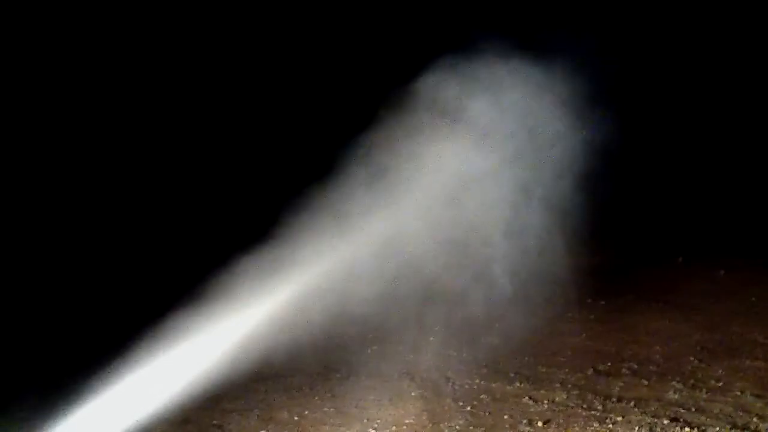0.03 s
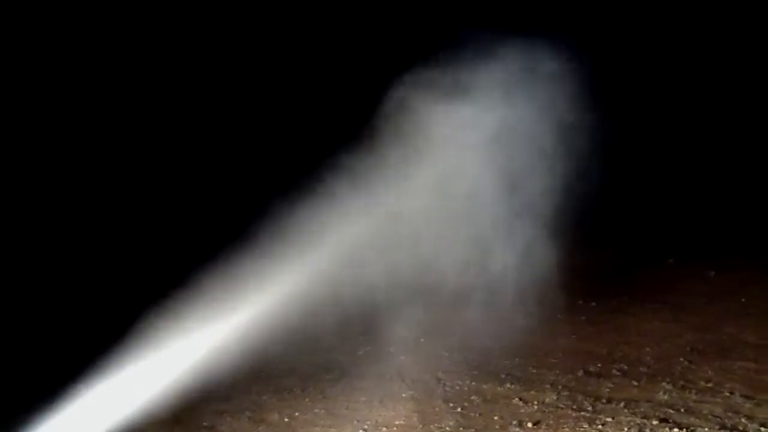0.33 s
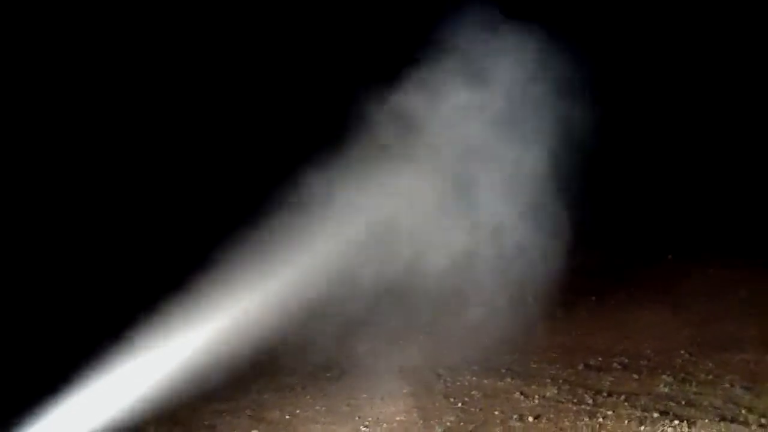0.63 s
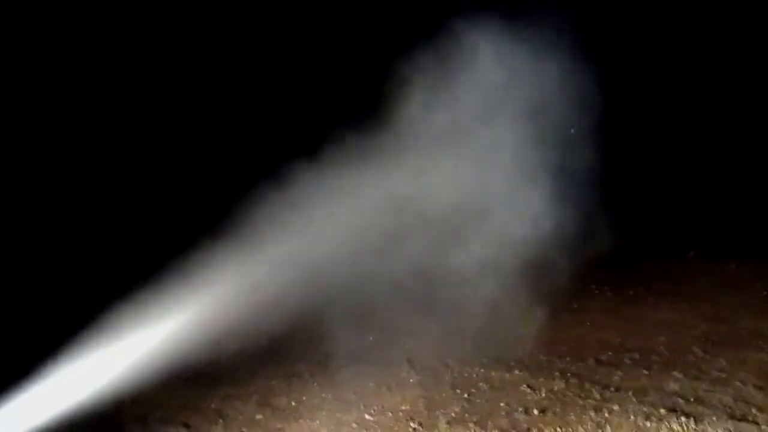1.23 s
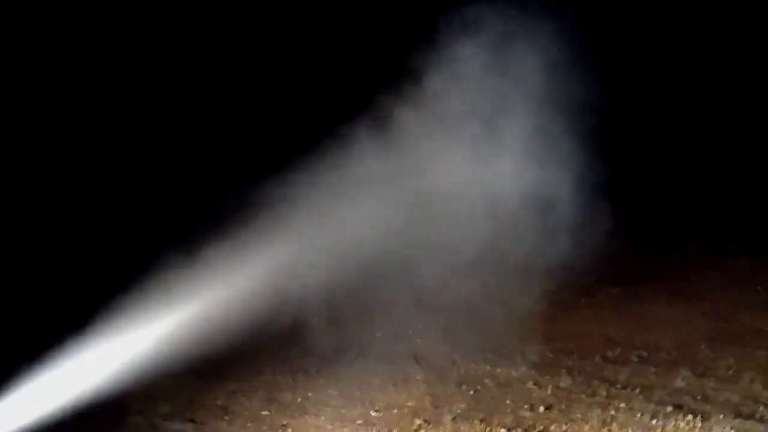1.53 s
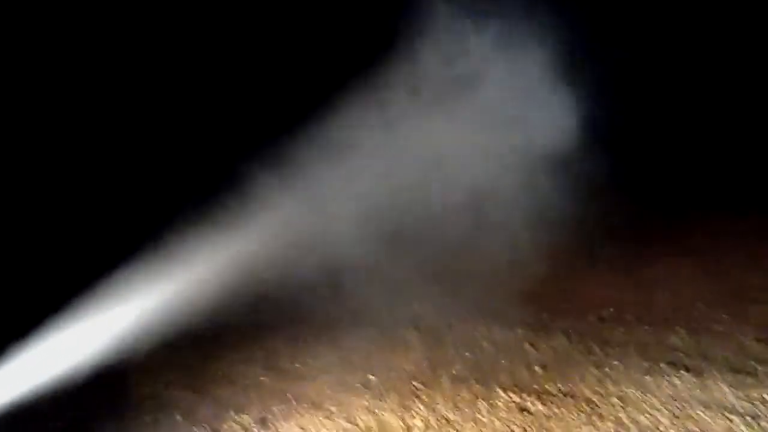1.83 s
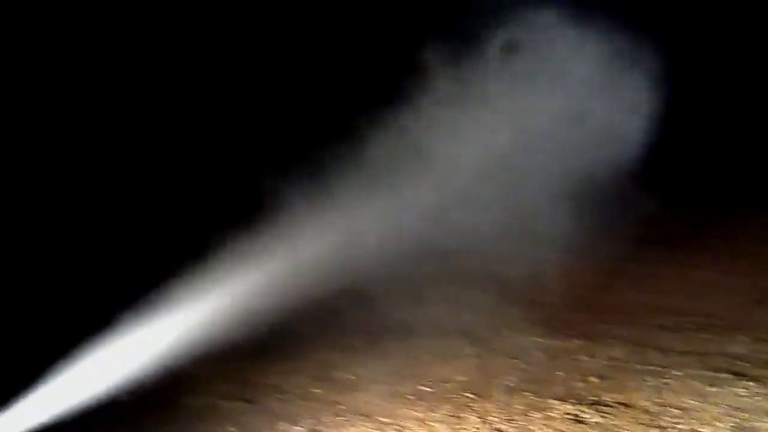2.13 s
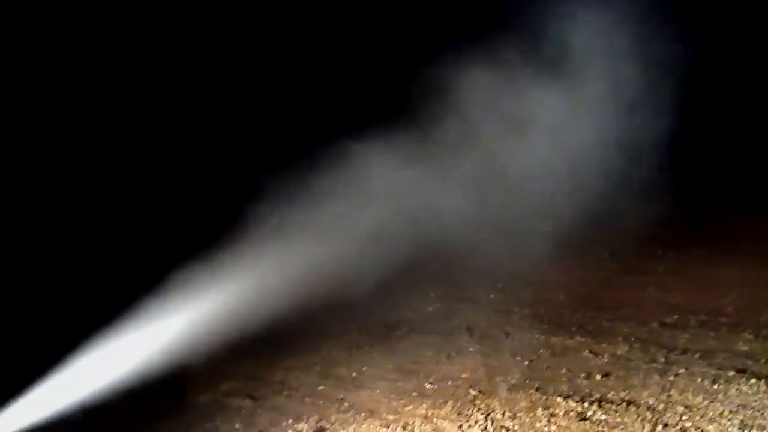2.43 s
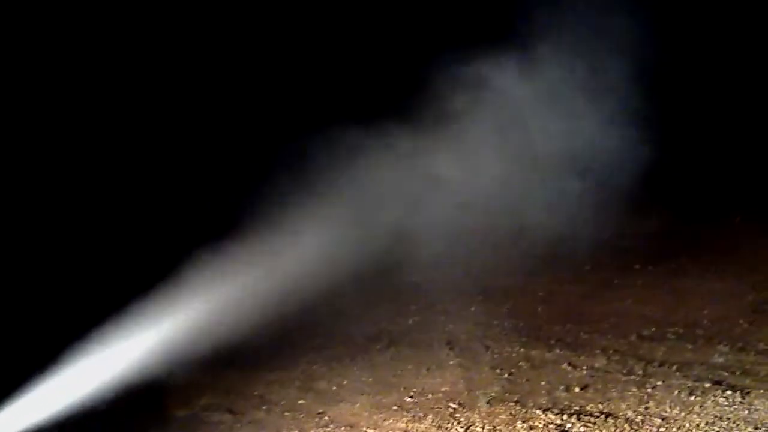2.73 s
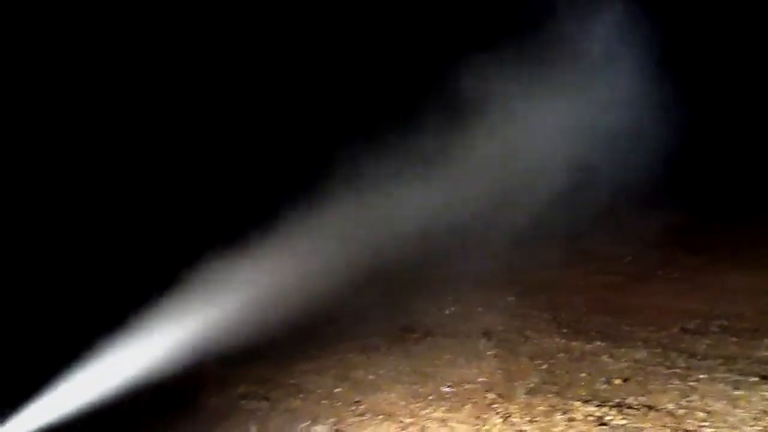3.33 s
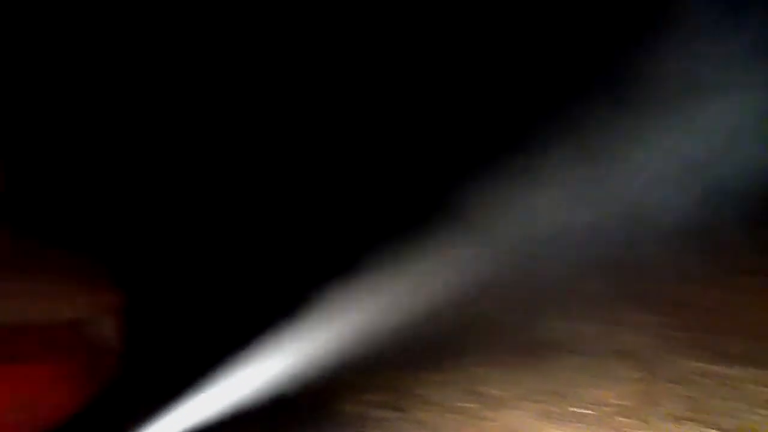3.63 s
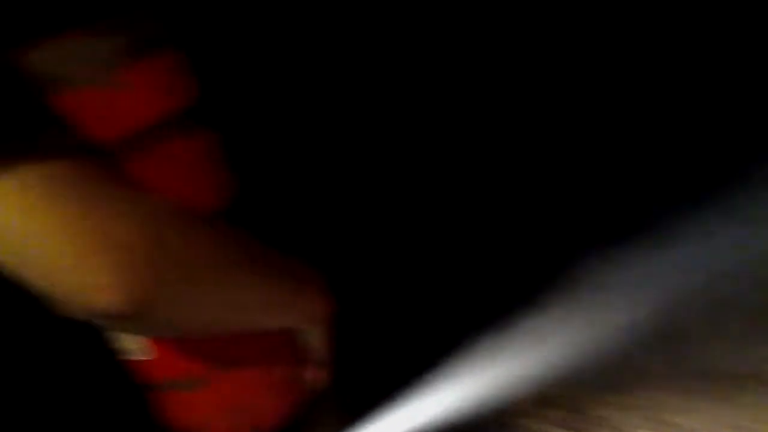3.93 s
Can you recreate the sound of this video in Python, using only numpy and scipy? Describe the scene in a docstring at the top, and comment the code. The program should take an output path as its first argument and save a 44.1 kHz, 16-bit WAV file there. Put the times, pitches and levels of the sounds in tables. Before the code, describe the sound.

A pressurized extinguisher sprays water close by outdoors, a loud, roaring hiss running from the very start, with droplets pattering faintly within it. From about 2 seconds the flow weakens, the roar fading faster than the high hiss, so the spray sounds thinner but is still going at 4 seconds. A very faint low hum lies underneath, rising slightly near 1.8 seconds and at the end.

```python
"""A roaring hiss, close by and in mono: a pressurized extinguisher sprays outdoors at night.
Its turbulent jet radiates broadband noise, coloured by resonances and faint echoes. As the flow
weakens, the roar fades faster than the top hiss, and single bands swell and dip.
Droplets patter faintly in the spray, and a low hum lies underneath."""
import sys
import numpy as np
from scipy import signal
from scipy.io import wavfile
from scipy.ndimage import map_coordinates

SR = 44100
rng = np.random.default_rng(int(sys.argv[2]) if len(sys.argv) > 2 else 0)


def unload_wav(signal):
    """Save mono or channel-first audio to the path in sys.argv[1] as 16-bit WAV at rate SR, clipped to [-1, 1]."""
    wavfile.write(
        sys.argv[1],
        SR,
        np.round(np.clip(np.atleast_2d(signal).T, -1, 1) * 32767).astype(np.int16),
    )


N = 176400


def undb(db):
    """Amplitude ratio for a level in decibels."""
    return 10 ** (np.asarray(db) / 20)

def unit(x):
    """Normalisation to rms 1."""
    return x / np.sqrt(np.mean(x ** 2))

def curve(x, table, column=1):
    """Linear interpolation between the rows of a table."""
    table = np.array(table, float)
    return np.interp(x, table[:, 0], table[:, column])

def bell(x, centre, width):
    """Gaussian of height 1, given its full width at half height."""
    return 2 ** -(2 * (x - centre) / width) ** 2

def wander(t, per_s):
    """Smooth random fluctuation with a standard deviation near 1."""
    return map_coordinates(rng.standard_normal(size=1024), [t * per_s], mode="wrap")

def colour(x, gain_db, frame=2048, hop=256):
    """Time-varying filtering: short-time spectra are weighted by gain_db(f/Hz, t/s)."""
    hz, t, bands = signal.stft(x, SR, nperseg=frame, noverlap=frame - hop)
    bands = bands * undb(gain_db(np.maximum(hz, 1)[:, None], t))
    return signal.istft(bands, SR, nperseg=frame, noverlap=frame - hop)[1][..., :N]

def cut_top(x, cutoff_hz=15350):
    """Steep elliptic low-pass filtering."""
    return signal.sosfilt(signal.ellip(12, .1, 85, cutoff_hz, fs=SR, output="sos"), x)


# Partials of the hum: f/Hz, relative level/dB
HUM_PARTIALS = [(78, -22), (119, -9), (227, -11.5)]
# Envelope of the hum: t/s, level/dB
HUM_ENVELOPE = [(0, -72), (1.0, -60), (1.45, -59), (1.75, -53.5), (2.1, -57.5), (2.6, -73), (3.2, -62),
                (3.7, -53), (4, -52.5)]

def hum(t, waver=.02, throb_db=2):
    """Random frequency and amplitude modulation make three low tones waver and throb."""
    tones = 0
    for hz, db in HUM_PARTIALS:
        pitch_hz = hz * (1 + waver * wander(t, per_s=8.2))
        tones += undb(db) * np.sin(2 * np.pi * np.cumsum(pitch_hz) / SR)
    throb = undb(throb_db * wander(t, per_s=14))
    return unit(tones * throb) * undb(curve(t, HUM_ENVELOPE))


def droplets(per_s=3000, spread_db=5):
    """Shot noise: independent droplets give dense, tiny ticks of uneven size."""
    hits = rng.random(N) < per_s / SR
    return unit(hits * rng.standard_normal(N) * undb(spread_db * rng.standard_normal(N)))


def echo_ripple(hz, t, count=30, ripple_db=1.3, full_above_hz=1300):
    """Comb filtering, in dB: echoes off nearby things interfere, and vary as the nozzle moves."""
    delays_s = rng.uniform(.0015, .011, count)
    phase = 2 * np.pi * hz * delays_s
    in_phase = np.array([wander(t, per_s=2.2) for _ in delays_s])
    quadrature = np.array([wander(t, per_s=2.2) for _ in delays_s])
    ripple = np.cos(phase) @ in_phase + np.sin(phase) @ quadrature
    return ripple_db * unit(ripple) * np.minimum(hz / full_above_hz, 1) ** 2


def flicker(hz, t, depth_db=.83, per_s=14, band_hz=605):
    """Random amplitude modulation, in dB: each band flickers independently."""
    places = np.array(np.broadcast_arrays(hz / band_hz, t * per_s))
    return depth_db * map_coordinates(rng.standard_normal(size=(256, 256)), places, order=1, mode="wrap")


# Passing swells and dips: centre t/s, half duration/s, f/Hz, bandwidth/Hz, gain/dB
BAND_SWELLS = [(.15, .46, 7600, 1200, 3.5), (.15, .4, 12000, 1600, -1.8), (.25, .35, 3780, 520, 2.2),
               (.25, .5, 700, 60, 3), (.35, .3, 1230, 300, 1.3), (.4, .6, 935, 60, 2.8),
               (.45, .7, 13750, 940, 3.5), (.55, .99, 8400, 1050, -7), (.9, .4, 10300, 600, -2),
               (1.1, .65, 5500, 1400, -1.6), (1.3, .5, 1725, 70, 1.6), (1.35, .45, 11850, 820, 2.2),
               (1.65, .2, 4100, 700, 1.6), (1.8, .2, 7500, 400, -2), (1.9, .4, 860, 45, 2.5),
               (2.0, .25, 1860, 50, 2.5), (2.0, .8, 650, 140, -1.3), (2.25, .3, 3100, 500, 1.6),
               (2.3, .8, 12900, 640, -2), (2.5, .8, 1020, 50, 4.4), (2.7, .4, 10500, 700, -1.5),
               (2.85, .3, 8700, 700, -3), (2.95, .57, 490, 200, -3.5), (3.0, .3, 1500, 50, 3),
               (3.5, 1.5, 820, 230, 2.5), (3.7, .65, 160, 70, 4), (4, .39, 1400, 500, -1.5)]

def swells(hz, t):
    """Slow amplitude modulation, in dB: single bands swell or dip under Gaussian envelopes."""
    return sum(gain * bell(hz, centre, width) * bell(t, middle, 2 * half)
               for middle, half, centre, width, gain in BAND_SWELLS)


# Steady peaks and hollows in the jet's spectrum: f/Hz, bandwidth/Hz, gain/dB
JET_RESONANCES = [(288, 85, 4.5), (342, 30, -2), (386, 35, 7), (445, 40, -2.5), (510, 45, 4.2),
                  (580, 45, -2.5), (700, 38, 3), (772, 32, 5.5), (815, 36, -6.5), (854, 30, 6.2),
                  (945, 46, 4.4), (1015, 45, 4.3), (1088, 36, -4), (1150, 35, 2), (1258, 40, 4),
                  (1305, 30, 2), (1380, 40, -3), (1512, 50, 4.6), (1572, 40, -1.5), (1706, 40, 5.4),
                  (1762, 55, 2), (1865, 55, 4.7), (1945, 60, -2.5), (2147, 45, 2.8), (2490, 55, 1.8),
                  (2574, 45, 3), (2850, 70, 2), (3040, 50, 1.8), (3190, 70, 2), (3525, 70, 2),
                  (3731, 50, 2), (3875, 50, 1.8)]

def resonances(hz):
    """Resonance and antiresonance raise and lower narrow bands; the sum is in dB."""
    return sum(gain * bell(hz, centre, width) for centre, width, gain in JET_RESONANCES)


# Strength of the jet, each band used about its mean: t/s, roar level/dB, hiss level/dB, sizzle level/dB
JET_STRENGTH = [(0, -25.4, -22.7, -21.0), (0.2, -25.0, -21.6, -20.1), (0.29, -25.7, -22.2, -21.0),
                (0.42, -24.5, -21.3, -20.4), (0.54, -25.1, -21.7, -20.6), (0.555, -27.2, -24.3, -21.4),
                (0.75, -27.4, -23.8, -20.5), (0.82, -26.3, -23.2, -20.1), (1.05, -26.1, -23.3, -20.1),
                (1.3, -26.4, -23.3, -20.3), (1.55, -27.3, -24.0, -20.8), (1.75, -27.3, -23.4, -21.1),
                (1.95, -27.8, -24.0, -21.5), (2.25, -28.9, -25.0, -22.1), (2.55, -29.8, -26.6, -23.5),
                (2.7, -29.9, -26.9, -23.4), (2.9, -30.7, -27.7, -23.7), (3.15, -32.1, -27.8, -23.4),
                (3.26, -33.0, -28.9, -24.4), (3.6, -34.5, -29.3, -24.0), (4, -35.3, -29.3, -24.2)]

def weakening_flow(hz, t, bass_follow=.75):
    """Frequency-dependent decay, in dB: as the flow weakens, the roar fades faster than the treble."""
    roar, hiss, sizzle = (curve(t, JET_STRENGTH, column) for column in (1, 2, 3))
    levels = (bass_follow * roar, roar, hiss, sizzle)
    anchors_hz = (250, 1550, 4250, 10100)  # where each level rules; crossfaded in between
    return sum(np.interp(np.log(hz), np.log(anchors_hz), share) * (level - level.mean())
               for share, level in zip(np.eye(len(levels)), levels))


# Broad spectrum of the jet noise: f/Hz, relative spectral density level/dB
TURBULENCE_SPECTRUM = [(25, -42), (55, -38), (100, -24), (170, -11.5), (260, -9), (460, -11.5), (620, -5.5),
                       (900, -4.5), (1400, -2.5), (2200, -2.5), (3500, -1.5), (5500, -1), (9000, 0.66),
                       (12000, 1.16), (15300, -1)]

def jet_response(hz, t):
    """Filters in cascade add in decibels: the broad spectrum plus all that colours it."""
    points_hz, points_db = np.array(TURBULENCE_SPECTRUM, float).T
    steady_db = np.interp(np.log(hz), np.log(points_hz), points_db) + resonances(hz)
    return steady_db + echo_ripple(hz, t) + weakening_flow(hz, t) + swells(hz, t) + flicker(hz, t)

def jet(t, level_db=-18.5, relative_drops_db=-12.5, flutter_db=.2):
    """Source and filter: turbulent noise and droplet ticks share one colouring and flutter together."""
    turbulence = rng.standard_normal(N)
    spray = colour(turbulence + undb(relative_drops_db) * droplets(), jet_response)
    flutter = undb(flutter_db * wander(t, per_s=20))
    return undb(level_db) * unit(cut_top(spray)) * flutter


def scene():
    """Superposition of jet and hum, the same in both channels."""
    t = np.arange(N) / SR
    return np.tile(jet(t) + hum(t), (2, 1))

def record(dry):
    """Band limiting removes the highest treble."""
    return cut_top(dry)


dry = scene()
out = record(dry)
unload_wav(out)
```